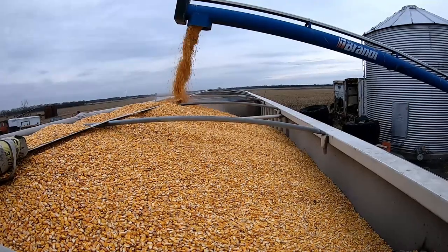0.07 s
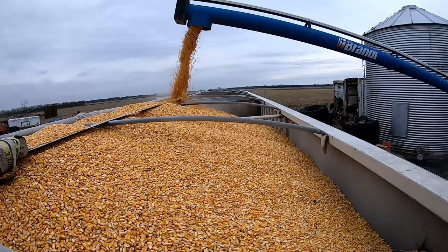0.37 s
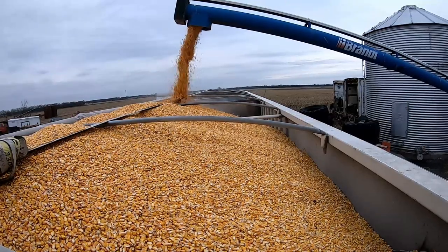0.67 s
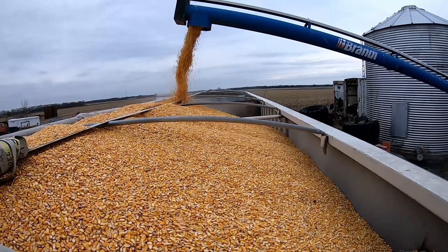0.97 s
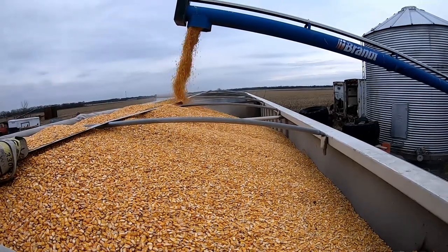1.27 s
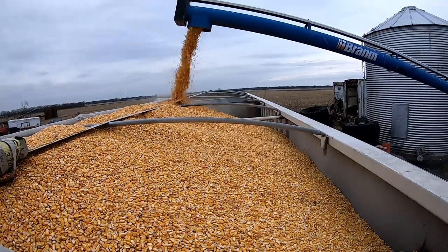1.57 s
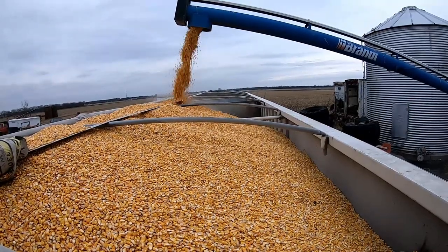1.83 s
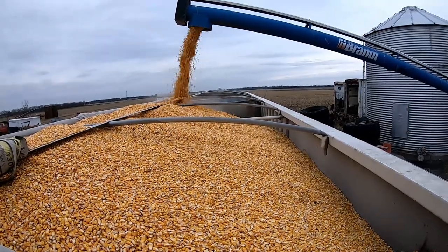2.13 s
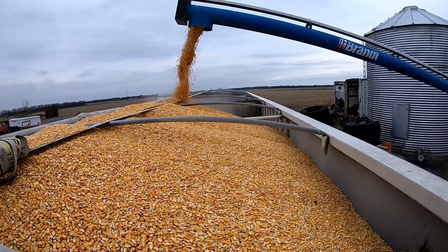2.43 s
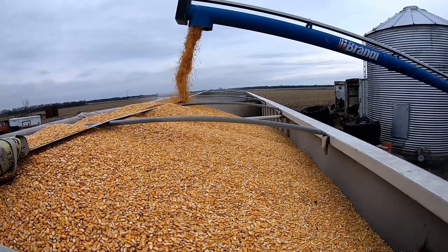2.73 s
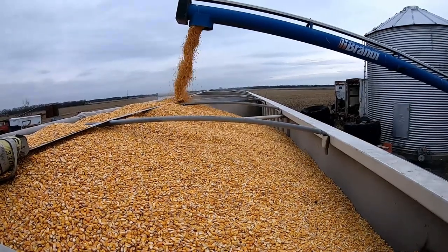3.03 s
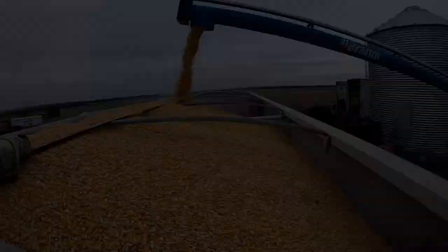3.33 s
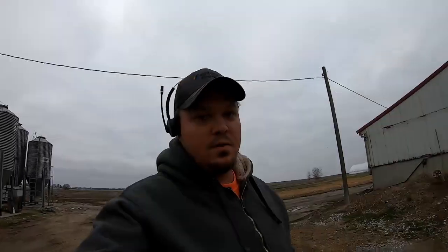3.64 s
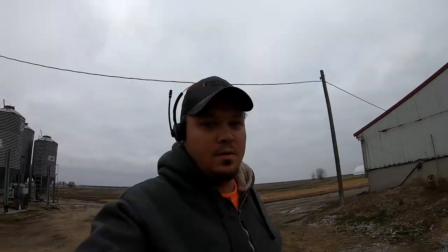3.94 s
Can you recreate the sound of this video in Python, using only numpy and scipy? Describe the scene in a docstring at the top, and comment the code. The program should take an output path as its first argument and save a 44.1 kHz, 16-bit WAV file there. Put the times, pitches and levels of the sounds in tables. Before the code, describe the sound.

A running farm auger grinds, rings and knocks rapidly as its diesel engine hums and corn patters into a hollow trailer. The noise stops suddenly; wind then buffets the microphone, with a faint tick and soft scuff.

```python
"""You hear a machine knocking over a diesel rumble, and corn hissing as it pours into a trailer.
The engine drives a grain auger, a long screw in a steel tube. Once a turn the screw hits the tube,
which clanks, rings and booms. Thousands of kernels land on the heap each second and make the hiss.
The sound cuts off; a quiet yard fades in, with wind on the microphone, a tick and one soft scuff."""
import sys
import numpy as np
from scipy import signal
from scipy.fft import rfft, irfft
from scipy.io import wavfile

SR = 44100
rng = np.random.default_rng(int(sys.argv[2]) if len(sys.argv) > 2 else 0)


def file_out(sig):
    """Save sig as 16-bit WAV at sys.argv[1]."""
    # one column per channel
    cols = np.atleast_2d(sig).T
    # limit, then scale
    lim = np.clip(cols, -1, 1)
    pcm = np.round(lim * 32767).astype(np.int16)
    wavfile.write(sys.argv[1], SR, pcm)


N = 176400
T = np.arange(N) / SR
HZ = np.maximum(np.arange(N // 2 + 1) * SR / N, 1)


def from_db(db):
    """Turn decibels into a gain."""
    return 10 ** (np.asarray(db) / 20)


def rms_one(x):
    """Scale a sound to an average power of 1."""
    return x / np.sqrt(np.mean(x ** 2) + 1e-20)


def in_time(rows):
    """A gain that follows a loudness curve."""
    return from_db(np.interp(T, *np.transpose(rows)))


def at_hz(points):
    """Read a table at every frequency, on a log scale."""
    hz, value = np.transpose(points)
    return np.interp(np.log(HZ), np.log(hz), value)


def pan(db):
    """Left and right gains, db apart."""
    return from_db(np.array([[db], [-db]]) / 2)


def drift(rate):
    """A slow random wobble of typical size 1."""
    return rms_one(irfft(rfft(rng.standard_normal(N)) / (1 + 1j * HZ / rate) ** 2, N))


def noise():
    """Two unrelated white noises."""
    return rng.standard_normal((2, N))


def grains(per_s, spread_db):
    """Two unrelated streams of tiny clicks of uneven size."""
    sizes = from_db(spread_db * np.minimum(rng.exponential(1, (2, N)), 5))
    return sizes * rng.choice([-1, 1], (2, N)) * (rng.random((2, N)) < per_s / SR)


def stereo(pair, response, alike):
    """Filter two unrelated sounds and mix them into left and right, at power 1."""
    mid, side = rfft(pair) * response
    alike = np.clip(alike, -.99, .99)
    return rms_one(irfft(np.sqrt(1 + alike) * mid + np.sqrt(1 - alike) * side * np.array([[1], [-1]]), N))


def colour(points):
    """A filter with the given tone that rings only after a click, never before."""
    cepstrum = irfft(np.log(from_db(at_hz(points))), N)
    cepstrum[1:N // 2] *= 2
    cepstrum[N // 2 + 1:] = 0
    return np.exp(rfft(cepstrum))


def body(modes):
    """A filter that rings at the given notes, added with alternating signs."""
    return sum((-1) ** k * from_db(db) / (1 + 1j * (HZ ** 2 - hz ** 2) / (HZ * width))
               for k, (hz, width, db) in enumerate(modes))


def ticks():
    """A small handling tick: a tiny burst of rubbing sounds one high note."""
    # t/s, f/Hz, width/Hz, level/dB
    tick_bursts = [(3.764, 5900, 1300, -61)]
    out = 0
    for s, hz, width, db in tick_bursts:
        burst = (T > s) * np.exp(-np.abs(T - s) / .0035)
        out = out + from_db(db) * burst * stereo(noise(), body([(hz, width, 0)]) ** 2, alike=0)
    return out


def yard():
    """Wind hits each side of the microphone; a faint airy hiss, a scuff and a tick sit to the right."""
    # wind loudness: t/s, level/dB
    gust_swell = [(3.66, -75), (3.68, -47), (3.75, -28), (3.772, -35), (3.82, -22), (3.86, -28),
                  (3.89, -20), (3.93, -29), (3.975, -26), (4, -45)]
    # wind tone: f/Hz, level/dB
    gust_tone = [(15, -9), (50, 3.5), (100, -4), (220, -22), (480, -44), (3000, -90)]
    # scuff loudness: t/s, level/dB
    scuff_swell = [(3.66, -89), (3.715, -63), (3.77, -57), (3.8, -52), (3.828, -49), (3.865, -57.5),
                   (3.95, -66)]
    # scuff tone: f/Hz, level/dB
    scuff_tone = [(200, -3), (600, 0), (950, -4), (1350, -1), (2200, -8), (4500, -24), (11500, -54)]
    # a faint, airy high hiss fades in with the quiet yard: t/s, level/dB
    air_swell = [(3.66, -95), (3.72, -73), (3.9, -59), (3.96, -64)]
    # its tone: f/Hz, level/dB
    air_tone = [(1400, 0), (4500, -13), (6700, -9), (11500, -35)]
    wind = in_time(gust_swell) * stereo(noise(), colour(gust_tone), alike=0)
    scuff = in_time(scuff_swell) * stereo(grains(9000, spread_db=3.5), colour(scuff_tone), alike=0)
    air = in_time(air_swell) * stereo(noise(), colour(air_tone), alike=0)
    return (wind + pan(db=-7) * (scuff + air + ticks())) * (T > gust_swell[0][0])


def breeze():
    """Wind rumbles on the microphone, mostly on the left."""
    # the wind rises and falls: t/s, level/dB
    wind_swell = [(.1, -35), (.22, -25), (.48, -30), (1.3, -39), (2.85, -37), (3.4, -43)]
    # its deep tone: f/Hz, level/dB
    wind_tone = [(15, -21.5), (42, 2), (130, 1.5), (310, -9), (1200, -42)]
    return in_time(wind_swell) * rms_one(pan(db=20)) * stereo(noise(), colour(wind_tone), alike=0)


def engine():
    """The diesel fires at a nearly steady rate, so its exhaust hums over a rumble."""
    # exhaust notes: multiple of the firing rate, relative level/dB
    exhaust_notes = [(.875, -47), (1, -45), (1.5, -45), (1.75, -40), (2, -32.5), (2.75, -43), (3, -34),
                     (3.25, -44), (3.75, -43), (4, -38.5), (11.25, -50), (11.5, -52)]
    # rumble tone: f/Hz, level/dB
    rumble_tone = [(15, -23), (32, -2.5), (62, -1.5), (125, 4.5), (170, -2.5), (230, -2), (300, -7),
                   (500, -7), (1000, -42)]
    firing_hz, speed_wander = 34.63, .0018
    firings = np.cumsum(firing_hz * (1 + speed_wander * drift(2.37))) / SR
    hum = sum(from_db(db) * np.sqrt(2) * np.sin(2 * np.pi * (k * firings + rng.random()))
              for k, db in exhaust_notes)
    rumble = pan(db=-1) * stereo(noise(), colour(rumble_tone), alike=1)
    return from_db(-1.35) * hum + from_db(-32.5) * rumble


def trailer(x):
    """Sound bounces off the trailer's steel walls, which makes it hollow."""
    # echo delays: t/s, level/dB
    wall_echoes = [(.0047, -29), (.0113, -20), (0.0208, -21.5)]
    return x + sum(from_db(db) * np.pad(x, ((0, 0), (int(s * SR), 0)))[:, :N] for s, db in wall_echoes)


def corn():
    """Each kernel clicks as it lands on the heap; together they patter and hiss."""
    # kernel tone: f/Hz, level/dB
    kernel_tone = [(1000, -15), (2500, -3.5), (3500, -1.5), (4000, -3.5), (4600, -2), (5300, -3),
                   (6300, 0.5), (7100, 0), (8200, -3.5), (9400, 2), (10000, -2), (11000, -14),
                   (12500, -16.5), (14300, -22), (15600, -32)]
    # how alike left and right are: f/Hz, likeness from -1 to 1
    likeness = [(2500, 0.94), (4500, 0.71), (6300, 0.26), (8200, -0.048), (9500, -0.24), (12000, -0.2)]
    # which side is louder: f/Hz, left minus right/dB
    balance = [(6400, -1), (7800, 2.5), (9000, -3.5), (10500, -1)]
    # a brighter patter joins near the end: t/s, level/dB
    bright_swell = [(3.2, -69), (3.29, -32), (3.46, -33)]
    # its tone: f/Hz, level/dB
    bright_tone = [(3000, -13), (9600, 4), (11000, -6), (16000, -22)]
    kernels_per_s, alike = 18000, at_hz(likeness)
    flow = from_db(-29.5 + .7 * drift(23))
    patter = flow * stereo(grains(kernels_per_s, spread_db=2.5), colour(kernel_tone), alike)
    bright = stereo(grains(kernels_per_s, spread_db=2.5), colour(bright_tone), alike)
    sides = from_db(np.stack([at_hz(balance), -at_hz(balance)]) / 2)
    return irfft(rfft(patter + in_time(bright_swell) * bright) * sides, N)


def scraping(times, levels_db):
    """How hard the screw presses on the wall: each scrape holds briefly, then lets go."""
    hold_s, release_s = .028, .008
    force = np.zeros(N)
    for s, db in zip(times, levels_db):
        age = T[int(s * SR):] - s
        force[int(s * SR):] += from_db(db) * np.clip((hold_s - age) / release_s + 1, 0, 1)
    return force


def clanks(times):
    """Each knock strikes several dull notes of the tube, each with its own strength."""
    # wider notes die sooner: f/Hz, width/Hz, level/dB
    clank_notes = [(594, 72, 1.5), (788, 90, -6), (1040, 54, 4), (1323, 83, 2)]
    spectrum = 0
    for note in clank_notes:
        signs = rng.choice([-1, 1], len(times))
        strengths = from_db(rng.normal(0, 2, (len(times), 2)).T)
        blows = np.zeros((2, N))
        blows[:, (times * SR).astype(int)] = signs * strengths
        spectrum = spectrum + rfft(blows) * body([note])
    return rms_one(irfft(spectrum, N))


def booms(times, levels_db):
    """The tube's low note swells and dies after each blow, never at quite the same pitch."""
    note_hz, pitch_spread, rise_s = 206, .018, .018
    age = T[:int(6 * rise_s * SR)]
    swell = (age / rise_s * np.exp(1 - age / rise_s)) ** 3
    out = np.zeros(N)
    for s, db in zip(times, levels_db):
        hz = note_hz * (1 + pitch_spread * rng.standard_normal())
        note = np.sin(2 * np.pi * (hz * age + rng.random()))
        start = int(s * SR)
        out[start:start + len(age)] += from_db(db) * swell * note
    return out


def auger():
    """Grain grinds in the tube; once a turn the screw clanks, scrapes and makes it ring and boom."""
    # one knock a turn: t/s, relative scrape level/dB, relative boom level/dB
    knocks = [(0.061, -1, 1), (0.194, 1, -1.5), (0.321, -1, 2.5), (0.451, 1, 1), (0.582, -3.5, -5),
              (0.718, -4, -0.5), (0.849, -4, -5), (0.986, -5.5, -13), (1.112, -3, -13), (1.233, -1.5, -1.5),
              (1.369, -1, -13), (1.498, 2, 1), (1.635, 1.5, -1.5), (1.762, 1, -3), (1.893, -3, -1.5),
              (2.018, -5, 2.5), (2.151, 0, -13), (2.281, 1, -1.5), (2.415, 0, -11), (2.548, 1, -0.5),
              (2.677, -2, 2.5), (2.803, -3, 1), (2.935, -1, -0.5), (3.07, -1, -0.5), (3.202, -1, -1.5),
              (3.329, -1, -0.5)]
    # tone of grain and screw grinding: f/Hz, level/dB
    grind_tone = [(200, -15), (390, -4.5), (470, -11.5), (600, 1), (780, -3), (910, -0.5), (1080, 1),
                  (1400, -3), (1650, -7), (1870, -4), (2050, -5.5), (2300, -6.5), (3200, -12), (4500, -23),
                  (9000, -55.5)]
    # the screw's edge scraping the wall: f/Hz, width/Hz, level/dB
    scrape_notes = [(1253, 280, 0), (1602, 71, 4.5), (1963, 220, 1.5), (3010, 300, -6.5)]
    # the tube's high notes: f/Hz, width/Hz, level/dB
    ring_notes = [(908, 23, -6), (1048, 45, -3.5), (1228, 30, -6), (2245, 50, -5), (2400, 90, -4),
                  (2530, 36, 1.5), (2582, 26, 7), (2822, 114, -7)]
    # its low notes: f/Hz, width/Hz, level/dB
    drone_notes = [(201.8, 4.1, 1.5), (216.3, 7.6, 0.5), (239.6, 43, -12)]
    contacts_per_s, rebound_s = 7000, .048
    times, scrape_db, boom_db = np.transpose(knocks)
    pressing = scraping(times, scrape_db)
    grind_gain = from_db(-31 + .44 * drift(28))
    grind = grind_gain * stereo(grains(contacts_per_s, spread_db=2), colour(grind_tone), alike=.24)
    rubbing = pressing * grains(contacts_per_s, spread_db=2)
    scrape = from_db(-38.5) * stereo(rubbing, body(scrape_notes), alike=.24)
    idle_force = from_db(-3.5 + 2.4 * drift(19))  # keeps the tube ringing between scrapes
    taps = np.hypot(idle_force, pressing) * grains(1500, spread_db=2)
    ring = from_db(-36.5) * stereo(taps, body(ring_notes), alike=.78)
    drone = from_db(-35.5) * stereo(noise(), body(drone_notes), alike=1)
    boom_times = times + .002  # just after each knock
    boom = booms(boom_times, boom_db)
    boom += booms(boom_times + rebound_s, np.full(len(times), -6))  # again as the screw falls back
    clank = from_db(-44) * clanks(times)
    return pan(db=-4) * (grind + scrape + clank) + ring + drone + from_db(-24.5) * boom


def scene():
    """The machine, corn and breeze cut off together; the quiet yard follows."""
    cut_s, fade_s = 3.462, .0024
    working = engine() + trailer(auger() + corn()) + breeze()
    return working * np.clip((cut_s - T) / fade_s, 0, 1) + yard()


def record(dry):
    """A steep filter removes the very highest hiss."""
    cutoff_hz = 15800
    return signal.sosfilt(signal.ellip(12, .1, 80, cutoff_hz, fs=SR, output="sos"), dry + 1e-18)


dry = scene()
out = record(dry)
file_out(out)
```